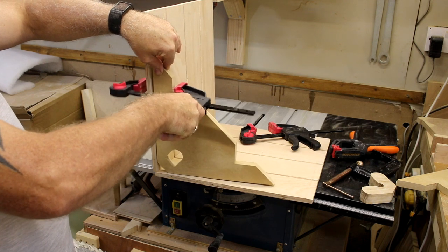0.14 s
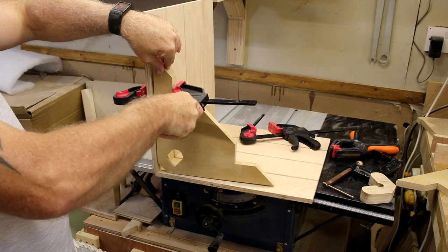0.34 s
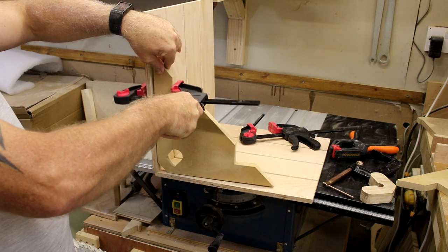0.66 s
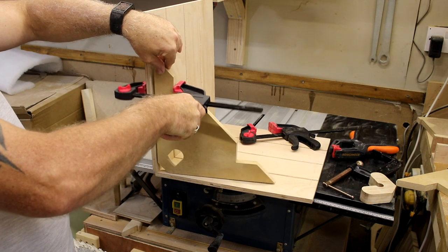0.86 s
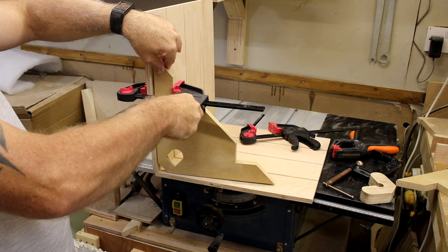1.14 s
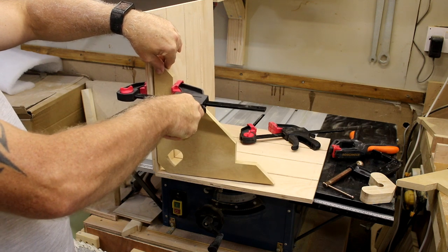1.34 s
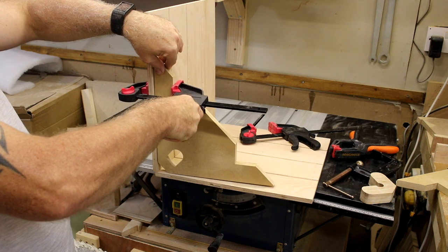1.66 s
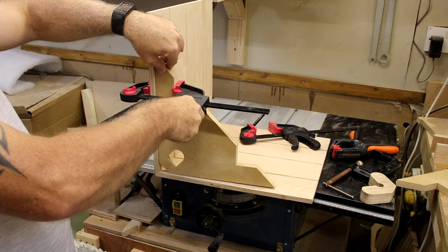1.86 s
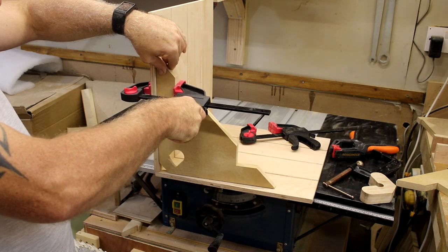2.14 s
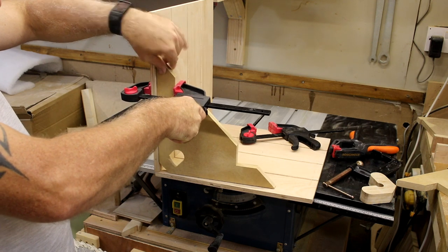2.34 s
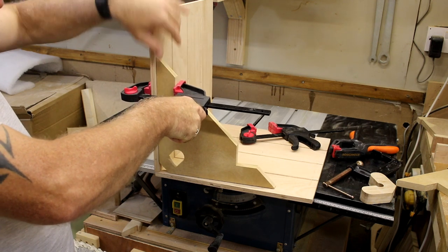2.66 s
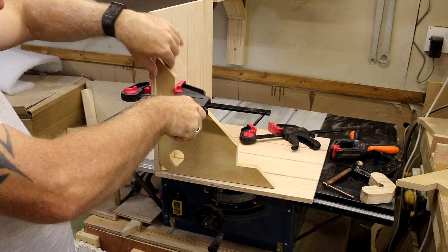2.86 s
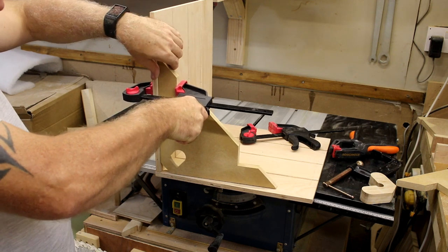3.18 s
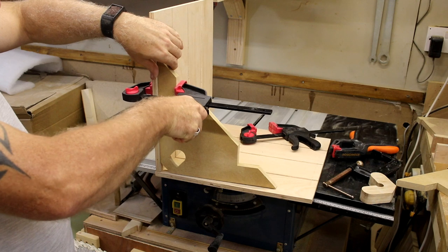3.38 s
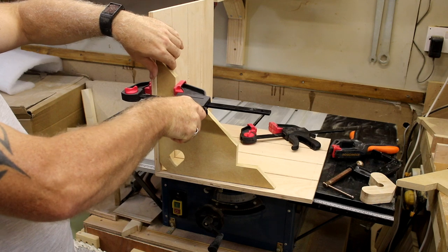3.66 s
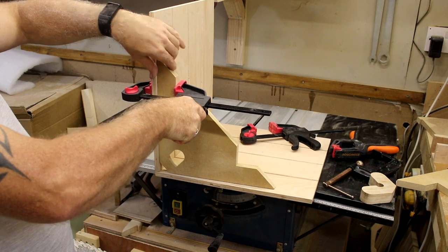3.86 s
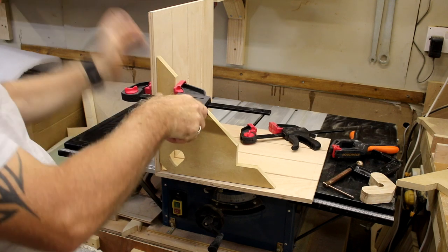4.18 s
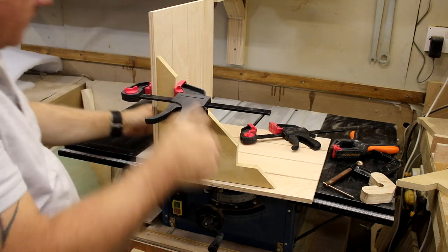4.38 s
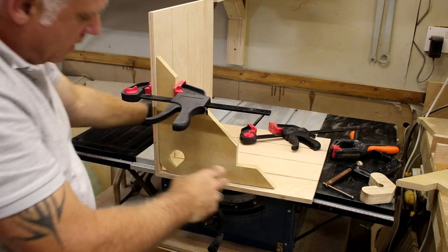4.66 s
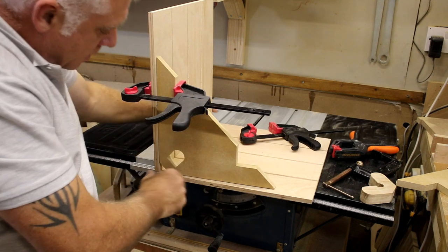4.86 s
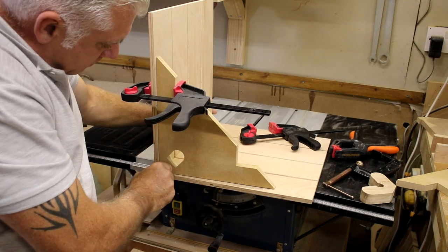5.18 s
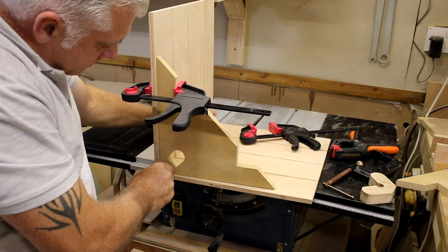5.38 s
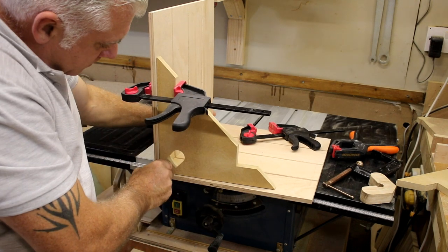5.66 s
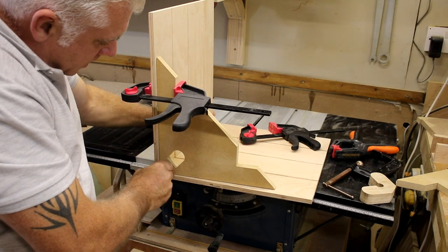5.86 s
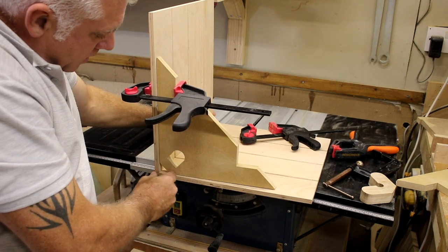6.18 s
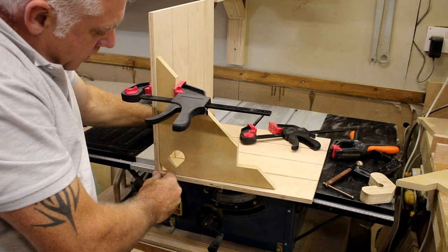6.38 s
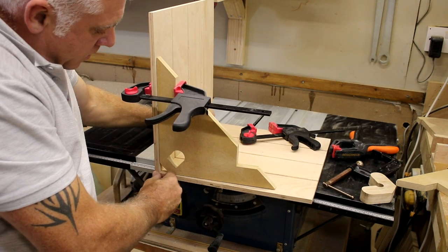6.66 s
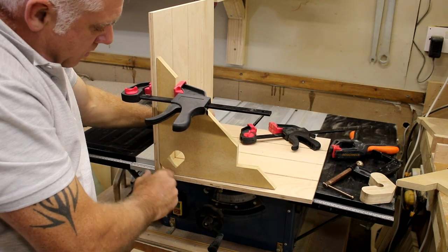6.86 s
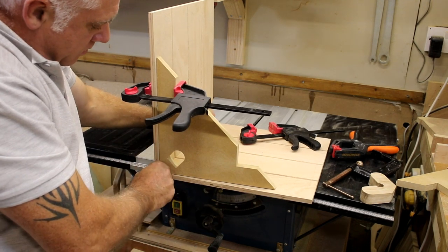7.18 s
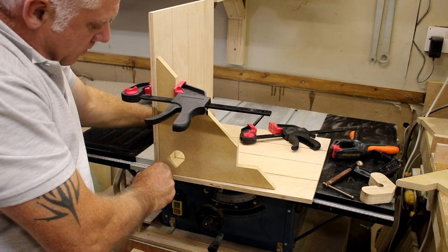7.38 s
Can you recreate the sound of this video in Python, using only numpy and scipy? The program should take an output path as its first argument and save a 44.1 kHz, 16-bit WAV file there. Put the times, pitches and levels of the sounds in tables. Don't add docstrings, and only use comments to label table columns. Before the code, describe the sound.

A trigger clamp is pumped tight in a small workshop: sharp ratchet clicks, wooden knocks, a loud snap, then brushing cloth and loose rail clanks.

```python
import sys
import numpy as np
from scipy import signal
from scipy.fft import rfft, irfft, next_fast_len
from scipy.io import wavfile
from scipy.ndimage import uniform_filter1d

SR = 44100
rng = np.random.default_rng(int(sys.argv[2]) if len(sys.argv) > 2 else 0)


def materialize(psi):
    bounded = np.clip(np.atleast_2d(psi).T, -1, 1)
    quanta = np.round(bounded * 32767).astype(np.int16)
    wavfile.write(sys.argv[1], SR, quanta)


def boost(x):
    u = np.asarray(x, float) / 20
    return 10 ** u


N = 332154

# pitch_hz, density_db [dB per Hz]
SHOP_AIR = [(150, -5.5), (300, -5.5), (600, -14.5), (1200, -13), (3000, -22), (6000, -30)]
BENCH_RUMBLE = [(25, -26), (46, -12), (66, 0), (100, -7), (135, -12), (200, -18)]
AMPLIFIER_HISS = [(12, -35.5), (20, -1.5), (409, -3.5), (526, -5), (6150, -4.5), (15900, -5)]
# start_s, level_db
LEANS = [(.06, -42.5), (.38, -44.5), (0.672, -45.5), (1.03, -48.5), (1.28, -42.5), (1.469, -40),
         (1.72, -41.5), (2.03, -36), (2.33, -51), (2.56, -51.5), (2.89, -47.5), (3.14, -44), (3.42, -49),
         (3.6, -44.5), (3.78, -56.5), (4.11, -43.5), (4.32, -48), (4.51, -50), (5.01, -42.5), (5.37, -47),
         (5.73, -55), (5.98, -50.5), (6.25, -59), (6.65, -54), (6.85, -57.5), (7.499, -58)]
# start_s, peak_db, pitch_hz, t60_s
THUMPS = [(1.101, -39.5, 339, 0.21), (1.458, -31, 79.5, 0.11), (1.947, -26.5, 137, 0.32),
          (1.97, -33.5, 78.3, 0.29), (2.41, -45, 610, 0.42), (2.225, -26, 460, 0.075),
          (2.795, -34, 354, 0.13), (3.094, -33, 354, 0.16), (3.112, -31, 350, 0.13),
          (3.665, -39.5, 350, 0.15), (1.746, -38.5, 301, 0.19), (4.09, -29, 356, 0.074),
          (5.68, -41, 718, 0.19), (4.289, -33.5, 220, 0.16), (5, -22.5, 97.5, 0.16),
          (5.939, -31.5, 352, 0.039), (5.961, -43, 124, 0.57), (6.155, -32, 665, 0.052)]
# start_s, peak_db, pitch_hz, t60_s
PINGS = [
    (.679, -45, 7100, .05),
    (.716, -37, 7000, .07),
    (1.402, -42, 7000, .05),
    (2.412, -40, 1000, .08),
    (3.094, -45, 1250, .06),
    (5.034, -33, 2560, .08),
    (5.109, -31, 2540, .09),
    (5.335, -40, 668, .45),
    (5.46, -42, 680, .06),
    (5.497, -43, 1800, .03),
]

# pitch_hz, density_db [dB per Hz]
RUB_MID = [(530, -12), (900, -26), (985, -14.5), (1130, -9.5), (1280, -7.5), (1630, -12), (1860, -5),
           (2100, -7), (2570, -7), (3100, -3), (4090, -9), (4750, -10.5), (5400, -22), (7020, -22.5),
           (11900, -120)]
RUB_LOW = [(170, -8.5), (330, 0), (460, -6.5), (640, -2), (840, -9.5), (1050, -6)]
JAW_TOP = [(4600, 1.5), (7700, -1.5), (11000, -5.5), (16000, -20)]
CLOTH_TOP = [(4600, -1), (6220, -6), (8730, -5), (9700, -7), (13400, -4), (15400, -9), (16200, -20)]
SKIN_TOP = [(4600, 23), (7000, 15.5), (10500, 17.5), (13000, 8), (16000, 4)]
GRIND_TOP = [(2700, -3.5), (3400, -3), (4200, -11)]
FLICK_TOP = [(5300, -4), (9000, -4), (11100, 0), (14800, -7), (16000, -17)]
# full_pressure_s, held_s, level_db, wood_share_db, bright_share_db
SLEEVE = [
    (4.54, 0.085, -51, -12, 3),
    (4.64, 0.013, -44.5, -6.5, -3),
    (4.71, 0.041, -40, -24, -2.5),
    (4.82, 0.23, -41.5, -9, -12.5),
]
FLICKS = [
    (4.135, .022, -53, -10, 9),
    (3.97, .02, -66, -10, 9),
]
SKIN = [
    (3.788, 0.0045, -66, 1, -7),
    (3.93, 0.046, -47, -11, -6),
    (3.985, 0.0032, -42, -5.5, -22),
    (4.02, 0.084, -61, 1, 8),
    (4.19, 0.096, -60.5, -3, 6.5),
    (4.28, 0.085, -57, -11, -1.5),
]
SCUFFS = [(5.38, 0.043, -38, -5, -17), (5.47, 0.022, -47, 0, -13), (5.69, 0.011, -50, -6, -12),
          (5.834, 0.0034, -49, -6, -19), (5.94, 0.043, -45.5, -2, -12.5), (6.05, 0.076, -46, -9.5, -10.5),
          (6.16, 0.035, -47, -5, -8.5), (6.23, 0.032, -56.5, -4, -17), (6.31, 0.069, -56, -5, -14),
          (6.604, 0.0036, -50.5, 0, -13), (6.876, 0.0049, -55.5, 0, -11), (7.17, 0.025, -53, -6, -11)]
JAW_DRAGS = [(0.0, .3, -60, 6, -6), (.55, 0.27, -61, -4, -6), (.95, .3, -57, -22, -9),
             (1.3, 0.25, -56, 0, -12), (1.8, 0.019, -68, 6, -18), (1.898, 0.023, -37, -10, -11.5),
             (2.108, 0.0041, -61, 3, 6.5), (2.424, 0.0084, -48, -9, -3), (2.49, 0.011, -50, -11, -17),
             (2.53, 0.0037, -65.5, 10.5, -9), (2.97, 0.07, -57, -2, -9), (3.068, 0.0071, -57, -2, -9),
             (3.21, 0.03, -45.5, -0.5, -11.5), (3.39, 0.02, -46, -4.5, -12.5),
             (3.5, 0.073, -56.5, 4.5, -11), (3.672, 0.0036, -65, 2, -9), (5.16, 0.022, -50.5, -8, -11),
             (5.3, .012, -48, -10, -15)]
SLIDES = [
    (2.49, .05, -48, -8, -12),
    (2.815, .075, -43, -5, -9),
    (2.9, .055, -46, -6, -10),
]
GRINDS = [
    (1.89, 0.043, -41, 1, 6),
    (4.702, 0.014, -48.5, -16, 16.5),
    (4.765, 0.023, -50, 0, 11.5),
    (5.075, 0.038, -34.5, -6.5, -4),
]

# pitch_hz, level_db, t60_s
PANEL = [(350, -1.5, 0.38), (460, -7.5, 0.37), (542, -4, 0.19), (648, -5.5, 0.25), (772, 7.5, 0.072),
         (990, -0.5, 0.13), (1250, -9, 0.039)]
BOARD = [(310, -5, .5), (456, -2, .9), (461.5, -3, .9), (678, 1, .45), (820, -1, .6), (826, -5, .5),
         (948, -5, .5)]
RAIL = [(3779, -4, .5), (3800, -12, .3), (3978, 3, .45), (4048, 3, .16), (4285, 6, .22), (4533, -2, .15),
        (4861, -3, .2)]
LATCH = [(2444, -5, .35), (3128, -8, .3), (3203, -2, .3), (3545, -9, .35), (3612, -8, .7), (3772, 0, .65),
         (3790, -5, .5), (3978, -5, .55), (4048, 1, .45), (4070, -6, .3), (4285, -2, .45), (4550, -12, .3),
         (4800, -2, .08)]
# start_s, level_db, rings_until_damped_s
PANEL_RINGS = [
    (.0165, -33.5, 0.097),
    (.3885, -32, 0.15),
    (.445, -39.5, .12),
]
BOARD_RINGS = [
    (2.2, -39, 0.36),
]
RAIL_RINGS = [
    (5.072, -39, .24),
]
LATCH_RINGS = [
    (5.315, -35, .33),
]

# pitch_hz, level_db, t60_s
FENCE = [(635, -1, .04), (969, -5, .04), (1320, -4, .03), (1800, -3, .03), (1920, -3, .03),
         (2260, -4, .035), (2990, -3, .03), (3220, -5, .04), (3450, -2, .035), (3840, -6, .035),
         (4360, -7, .04)]
BRACKET = [(330, -6, .14), (466, -6, .08), (629, -6, .08), (842, -11, .05), (1110, -6, .04),
           (1242, -3, .04), (1400, -5, .035), (1782, -8, .03), (2407, -2, .04), (2990, -5, .03),
           (3199, -2, .05), (3271, -2, .04), (3345, -2, .035), (3560, -4, .03)]
PAD = [(554, -6, .06), (630, -4, .04), (716, -9, .04), (991, -9, .05), (1265, -10, .05), (1453, -4, .035),
       (1900, -9, .03), (2300, -7, .03), (2480, -4, .04), (2622, -3, .05), (2800, -1, .035), (2880, 0, .05),
       (3040, -1, .06), (3155, -3, .05)]
BAR = [(619, -4, .04), (1020, -5, .025), (1870, -2, .025), (2220, -1, .035), (2540, -5, .03),
       (2840, -5, .04), (3120, 0, .03), (3570, -2, .035), (3890, -1, .03), (4300, -6, .02),
       (4900, -10, .015)]
LOCK = [(6900, -7.5, 0.06), (7550, -13, .03), (7670, 4.5, 0.018), (7890, 5.5, 0.026), (8300, 1.5, 0.024),
        (8240, -5.5, 0.018), (8640, -10, 0.035), (9360, -6.5, .02), (10500, -2.5, 0.006), (12000, -3, .007),
        (13270, -1.5, .008), (14800, -5, .007)]
JAW = [(347, -15, .15), (661, -14, .055), (799, -6, .045), (988, -11, .05), (1173, -11, .055),
       (1300, -13, .03), (1585, -19, .03), (1960, -8, .028), (2060, -9, .035), (2215, -6, .03),
       (2505, -8, .03), (2850, -11, .022), (3180, 6, .02), (3500, -7, .018)]
# start_s, peak_db, time_to_full_bite_s
FENCE_BITES = [
    (5.62, -39, 0.021),
    (5.67, -32, 0.02),
    (5.93, -36, 0.006),
    (6.0, -35, 0.013),
    (6.04, -37, .02),
    (6.09, -36, 0.021),
    (6.145, -34.5, 0.015),
    (6.2, -42, 0.027),
    (6.26, -49, .02),
]
BRACKET_BITES = [
    (2.1896, -14, .0015),
    (2.218, -25, .004),
    (2.232, -23, .003),
    (2.485, -39, .012),
    (2.512, -37, .012),
    (6.874, -37, .002),
]
PAD_BITES = [
    (3.1268, -14.5, .0028),
]
BAR_BITES = [
    (2.79, -29, 0.018),
    (2.825, -25.5, 0.014),
    (2.86, -28.5, 0.011),
    (2.91, -40, 0.012),
]
CREAKS = [(.0165, -50, 0.0047), (.048, -46, 0.0032), (0.3887, -45, 0.0028), (.1, -54, 0.0059),
          (0.144, -47, 0.008), (0.219, -47, .003), (.285, -46, 0.0068), (.5, -51, 0.012),
          (.555, -40.5, 0.0074), (.92, -39, 0.0066), (1.141, -38, 0.0078), (1.169, -41, 0.008),
          (1.3, -33.5, 0.0053), (1.51, -51, 0.0082), (1.547, -46, 0.0068), (1.579, -54, 0.018),
          (1.742, -41, 0.0056), (1.795, -46, 0.0031), (1.843, -54, 0.0027), (4.138, -35, .007),
          (4.22, -43.5, 0.017), (4.3, -41, 0.016)]
LOCK_BITES = [
    (.7092, -19, 0.0024),
    (.7556, -18.5, 0.0012),
    (1.1587, -19.5, 0.0016),
    (1.748, -47, 0.0017),
]
JAW_BITES = [
    (1.9392, -.5, .0022),
    (1.9992, -16, .0025),
]

# pitch_hz, level_db, t60_s
WOOD = [(201, -35.5, 0.057), (250.5, -1.5, 0.23), (350, 6, 0.1), (548, 0.5, 0.088), (598, 1.5, 0.05),
        (800, 5.5, 0.031), (1053, 3.5, 0.01894)]
HANDLE = [(1052, 4.5, 0.015), (1283, 5.5, 0.14), (1463, -1.5, 0.0087), (1920, -0.5, 0.051),
          (2627, 2.5, 0.03), (2910, 5.5, 0.0094), (3160, 8, 0.043), (3637, 2, 0.0066), (3720, 3, 0.0424)]
PLATES = [(4070, 16.5, 0.0161), (5260, 11.5, 0.012), (5680, 9.5, .02), (8130, 4.5, 0.021),
          (7300, -10.5, 0.055), (8400, 0, 0.015), (11000, -3, .015), (16040, -21, 0.0084)]
RAIL_TOP = [(4200, 1, .02), (6300, 0, .02), (7300, -4, .02), (8350, -3, .02), (10500, -1, .03),
            (12500, -8, .02), (15500, -20, .01)]
# start_s, peak_db, wood_share_db, bright_share_db, rattle_s
RAIL_BLOWS = [
    (4.5102, -47.5, 1, -2, 0.017),
    (5.0323, -23.5, -6, 1.5, 0.015),
    (5.0716, -27, -21, 1.5, 0.03),
    (5.1081, -29, -13, 3.5, 0.021),
    (5.3147, -20.5, -20.5, 0.5, 0.023),
    (5.8173, -37, -34, -19, 0.013),
    (5.8828, -28, -44, -4.5, 0.0073),
    (6.0027, -35, -8, -13, 0.016),
    (6.8736, -32, -7.5, -10.5, 0.0049),
]
# start_s, peak_db, wood_share_db, bright_share_db, rattle_s
CLUNKS = [
    (.67, -31, -16, -22, 0.0044),
    (1.0869, -41.5, 1, -4, 0.018),
    (1.3988, -33, -9, -2, 0.011),
    (1.5013, -40.5, -4.5, -7.5, 0.044),
    (2.4126, -30.5, -9.5, -32, 0.0084),
    (4.281, -24, -8, -39, 0.011),
]
# start_s, peak_db, wood_share_db, bright_share_db
SNAPS = [
    (1.9404, -20, -8, -20),
    (1.996, -27, 3, -40),
    (3.1275, -27, -8, -6),
]
KNOCKS = [(.0162, -26.5, 0.5, -40), (.2484, -40, -22.5, -3), (.388, -27, 1.5, -40), (.4448, -37, 8, -24),
          (.5424, -26.5, -25, -12), (.9097, -25.5, -24, -14), (1.1925, -26, -11, -8),
          (1.3884, -52.5, 17.5, -14), (1.731, -24.5, -10.5, -20.5), (1.9377, -20, -10, -22),
          (2.2358, -23, -3, -50), (3.1067, -31, 1.5, -13), (3.656, -40.5, -3.5, -12),
          (4.082, -19.5, -11.5, -46)]
CLICKS = [(.0856, -23.5, -25, -2), (.1337, -9, -39, -10.5), (.1777, -35.5, 0.5, -1),
          (.2699, -37.5, -25, -3.5), (.4896, -20, -17, -4), (.6229, -26.5, -17.5, -7),
          (.6784, -33.5, -12, -0.5), (.7094, -13.5, -23, -4.5), (.7558, -16, -25, -2.5),
          (.8631, -24, -28, -4), (1.002, -28, -24, -8), (1.0238, -38.5, -6, 3.5), (1.1589, -19.5, -18, 0),
          (1.25, -21, -24, -1.5), (1.454, -26.5, -7, -5.5), (1.673, -25, -14.5, -5.5),
          (1.7534, -33.5, -6.5, -17), (2.1017, -26, -17, -32), (2.1896, -13.5, -34, -8),
          (2.2182, -26, -25, -4), (2.6765, -21.5, -19, -14), (3.3741, -37, -6, -6),
          (3.438, -29.5, -18, -28), (3.5388, -30.5, -12.5, -12), (4.1285, -17.5, -16, -3)]


def colour(x, spectrum, skirt_db=60):
    hz, db = np.transpose(spectrum)
    n = next_fast_len(len(x), True)
    points = np.log2(hz)
    octave = np.log2(np.arange(n // 2 + 1) * SR / n + 1)
    outside = np.maximum(points[0] - octave, 0) + np.maximum(octave - points[-1], 0)
    gain_db = np.maximum(np.interp(octave, points, db) - skirt_db * outside, -100)
    cepstrum = irfft(np.log(boost(gain_db)), n)
    cepstrum[1:(n + 1) // 2] *= 2
    cepstrum[n // 2 + 1:] = 0
    y = irfft(rfft(x, n) * np.exp(rfft(cepstrum)), n)[:len(x)]
    return y / np.std(y)


def add(out, s, sound):
    i = int(s * SR)
    out[i:i + len(sound)] += sound[:N - i]


def swell(time, s, held, pace):
    rise_db_s, fall_db_s = pace
    before = np.maximum(s - time, 0)
    after = np.maximum(time - s - held, 0)
    return boost(-rise_db_s * before - fall_db_s * after)


def grit(size, rough_db):
    return rng.standard_normal(size) * boost(rough_db * rng.exponential(size=size))


def even(x, span=200):
    spectrum = rfft(x)
    humps = uniform_filter1d(np.abs(spectrum) ** 2, size=len(x) // span)
    y = irfft(spectrum / np.sqrt(humps), len(x))
    return y * (np.arange(len(x)) < len(x) * .75)


def ring(modes, seconds, lean_db=0, detune=0):
    hz, db, t60 = np.transpose(modes)
    t = np.arange(int(seconds * SR))[:, None] / SR
    decay = boost(db + lean_db - 60 * t / t60)
    return (decay * np.sin(2 * np.pi * hz * (1 + detune) * t)).sum(axis=1)


def noise_crowd(size, t60_s):
    return rng.standard_normal(size) * boost(-60 * np.arange(size) / SR / t60_s)


def body(modes, lean_db, crowd_t60, lines_db, crack):
    hz, db = np.transpose(modes)[:2]
    level_chance, pitch_chance = rng.standard_normal((2, len(modes)))
    clear = ring(modes, .18, lean_db + 2 * level_chance, .02 * pitch_chance)
    clear *= np.linspace(1, 0, len(clear))
    crowd = noise_crowd(len(clear), crowd_t60)
    crowd[0] = crack * np.linalg.norm(crowd)
    filled = colour(even(crowd), np.transpose([hz, db + lean_db]))
    return filled + boost(lines_db) * colour(clear, [(hz[0], 0), (hz[-1], 0)])


def room(x):
    t60_s, onset_s, top_hz, wash_db = 0.18, 0.0079, 5000, -10.5
    t = np.arange(SR // 2) / SR
    tail = noise_crowd(len(t), t60_s) * np.minimum(t / onset_s, 1) ** 2
    tail = signal.lfilter(*signal.butter(1, top_hz, fs=SR), tail)
    return x + boost(wash_db) * signal.oaconvolve(x, tail / np.linalg.norm(tail))[:N]


def shop_air():
    return boost(-61.5) * colour(rng.standard_normal(N), SHOP_AIR)


def bench():
    rest_db, lean_pace = -59.5, (130, 74)
    time = np.arange(N) / SR
    power = boost(rest_db) ** 2
    for s, db in LEANS:
        power = power + (boost(db) * swell(time, s, 0, lean_pace)) ** 2
    out = np.sqrt(power) * colour(rng.standard_normal(N), BENCH_RUMBLE)
    for s, db, hz, t60 in THUMPS + PINGS:
        sound = ring([(hz, db, t60)], .3)
        onset = np.minimum(np.arange(len(sound)) * hz * 2 / SR, 1)
        add(out, s, sound * onset)
    return out


def rubbing(strokes, top_colour, pace):
    out = np.zeros(N)
    for s, held, db, wood_db, top_db in strokes:
        time = max(s - .2, 0) + np.arange(32768) / SR
        slips = grit(len(time), rough_db=1.5)
        crowd = noise_crowd(2048, .05)
        crowd[0] = 1.29 * np.linalg.norm(crowd)
        rung = signal.fftconvolve(slips, crowd)[:len(time)]
        patchy = boost(1.4 * colour(rng.standard_normal(len(time)), [(15, 30), (120, -22)]))
        bright = colour(slips + .5 * rung / np.std(rung), top_colour)
        sound = colour(rung, RUB_MID) + boost(wood_db) * colour(rung, RUB_LOW) + boost(top_db) * bright
        add(out, time[0], boost(db) * swell(time, s, held, pace) * patchy * sound)
    return out


def hands_and_cloth():
    out = rubbing(SLEEVE, CLOTH_TOP, pace=(310, 84))
    out += rubbing(FLICKS, FLICK_TOP, pace=(2000, 600))
    return out + rubbing(SKIN, SKIN_TOP, pace=(350, 185))


def jaws_and_steel():
    out = rubbing(SCUFFS, JAW_TOP, pace=(227, 310))
    out += rubbing(JAW_DRAGS, JAW_TOP, pace=(390, 150))
    out += rubbing(SLIDES, JAW_TOP, pace=(600, 900))
    return out + rubbing(GRINDS, GRIND_TOP, pace=(1640, 300))


def rings(table, modes):
    out = np.zeros(N)
    for s, db, lasts in table:
        sound = boost(db) * ring(modes, lasts)
        k = np.arange(len(sound))
        fade = np.minimum(k / 80, k[::-1] / 1500)
        add(out, s, sound * np.minimum(fade, 1))
    return out


def wavering(table, modes, wobble_db):
    out = np.zeros(N)
    for mode in modes:
        wobble = colour(rng.standard_normal(N // 8 + 1), [(40, 0), (300, 0)])
        out += rings(table, [mode]) * boost(wobble_db * np.repeat(wobble, 8)[:N])
    return out


def loose_parts():
    out = wavering(RAIL_RINGS, RAIL, wobble_db=1.5)
    out += wavering(LATCH_RINGS, LATCH, wobble_db=2)
    return out + wavering(BOARD_RINGS, BOARD, wobble_db=2)


def bites(table, modes):
    out, t = np.zeros(N), np.arange(4096) / SR
    response = ring(modes, .15)
    response *= np.linspace(1, 0, len(response))
    response = colour(response, [(modes[0][0], 0), (modes[-1][0], 0)], skirt_db=30)
    for s, db, rise_s in table:
        rise = np.clip(rise_s, .001, .018)
        slips = grit(len(t), rough_db=2) * t / rise * np.exp(-t / rise)
        sound = signal.fftconvolve(even(slips, span=600 if rise < .003 else 200), response)
        add(out, s, boost(db) * sound / np.abs(sound).max())
    return out


def singing_parts():
    out = bites(FENCE_BITES, FENCE) + bites(BRACKET_BITES, BRACKET) + bites(PAD_BITES, PAD)
    out += bites(BAR_BITES + CREAKS, BAR)
    return out + bites(LOCK_BITES, LOCK) + bites(JAW_BITES, JAW)


def blows(table, top, centre_hz, focus, first, rattle_s=None):
    out, t = np.zeros(N), np.arange(4096) / SR
    near_db = -focus * np.log2(np.array(HANDLE)[:, 0] / centre_hz) ** 2
    for s, db, wood_db, top_db, *own in table:
        rattle = rattle_s or own[0]
        push = grit(len(t), rough_db=2.5) * np.exp(-t / rattle) * np.sqrt(1 / (rattle * SR))
        push[0] += first * np.sqrt(.005 / rattle)
        push = even(push)
        handle = body(HANDLE, near_db, crowd_t60=.022, lines_db=-16, crack=1.1)
        wood = body(WOOD, 0, crowd_t60=.042, lines_db=.5, crack=.61)
        steel = body(top, 0, crowd_t60=.03, lines_db=-13, crack=1.1)
        for share_db, response in ((0, handle), (wood_db, wood), (top_db, steel)):
            part = signal.fftconvolve(push, response)
            add(out, s, boost(db + share_db) * part / np.abs(part).max())
    return out


def fence_rail():
    return blows(RAIL_BLOWS, RAIL_TOP, centre_hz=3200, focus=1.4, first=.57)


def clamp():
    out = blows(CLUNKS, PLATES, centre_hz=2280, focus=2.3, first=.76)
    out += blows(SNAPS, PLATES, centre_hz=2660, focus=28, first=.45, rattle_s=.0028)
    out += blows(KNOCKS, PLATES, centre_hz=1200, focus=4.8, first=.45, rattle_s=.003505)
    out += rings(PANEL_RINGS, PANEL)
    return out + blows(CLICKS, PLATES, centre_hz=3450, focus=4.16, first=.82, rattle_s=.0045)


def scene():
    mono = shop_air() + bench()
    mono += hands_and_cloth() + jaws_and_steel()
    mono += room(loose_parts())
    mono += room(singing_parts())
    mono += room(fence_rail() + clamp())
    return np.array([mono, mono])


def roll_off(x):
    return signal.sosfilt(signal.butter(12, 16810, fs=SR, output="sos"), x)


def record(dry):
    hiss_db, bass_hz, top_hz = -59, 40, 15500
    hiss = np.array([colour(rng.standard_normal(N), AMPLIFIER_HISS) for _ in dry])
    thin = signal.sosfilt(signal.butter(2, bass_hz, "high", fs=SR, output="sos"), dry)
    top_cut = signal.ellip(8, .2, 60, top_hz, fs=SR, output="sos")
    mix = signal.sosfilt(top_cut, thin + boost(hiss_db) * hiss)
    return roll_off(np.clip(mix, -1, 1))


dry = scene()
out = record(dry)
materialize(out)
```